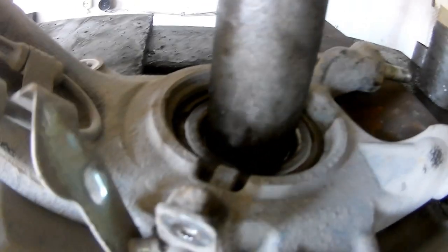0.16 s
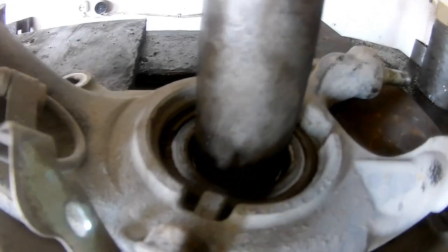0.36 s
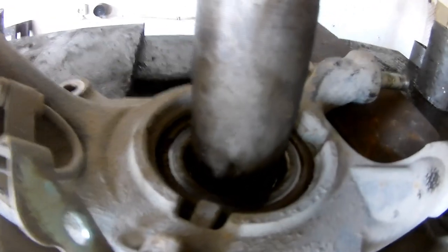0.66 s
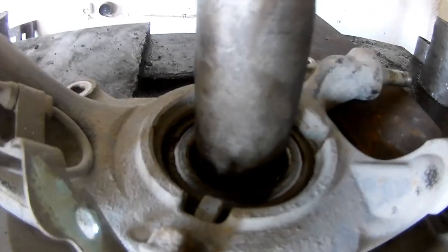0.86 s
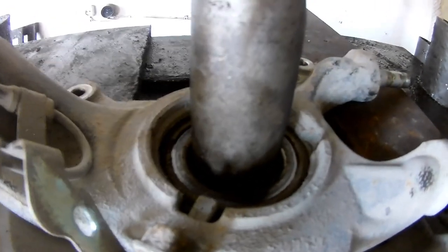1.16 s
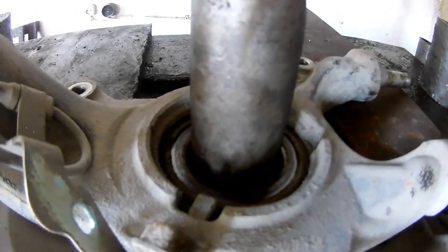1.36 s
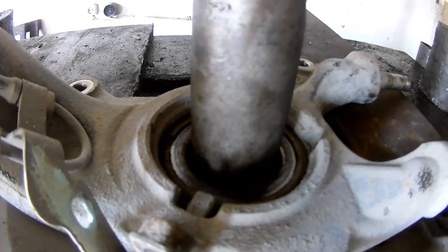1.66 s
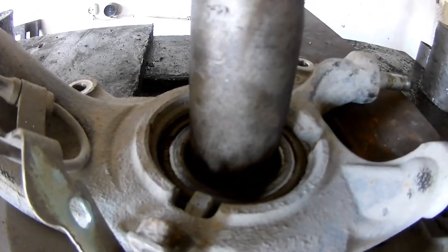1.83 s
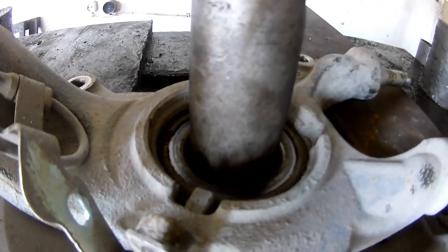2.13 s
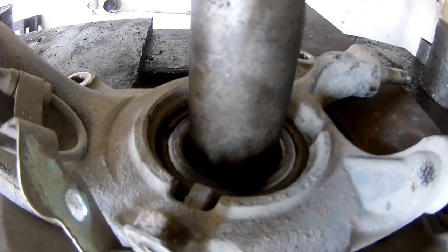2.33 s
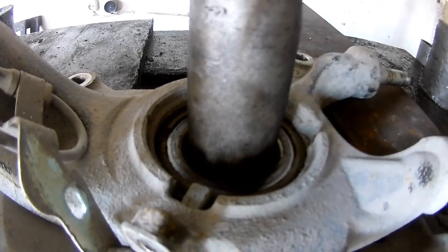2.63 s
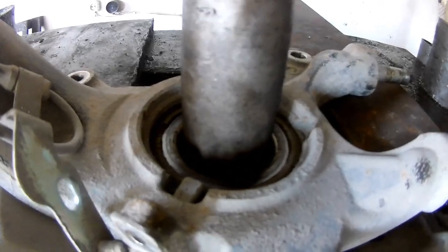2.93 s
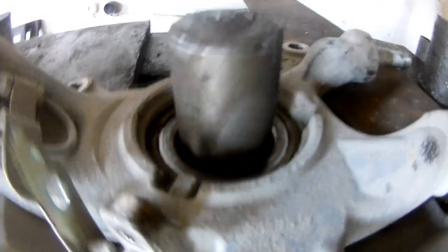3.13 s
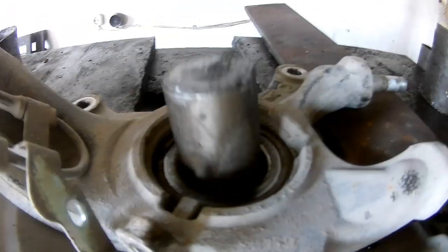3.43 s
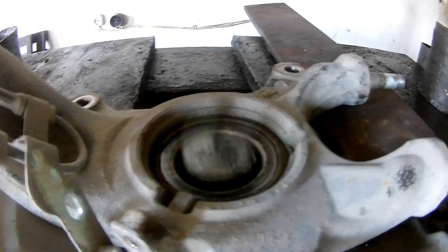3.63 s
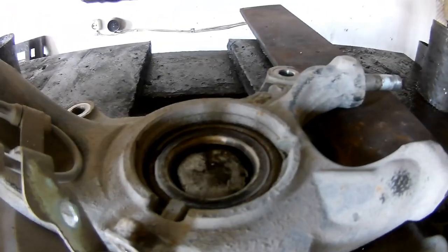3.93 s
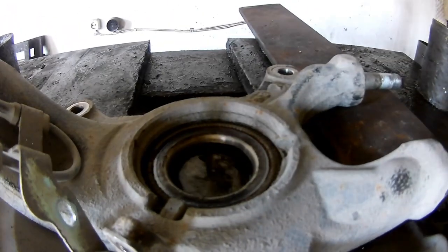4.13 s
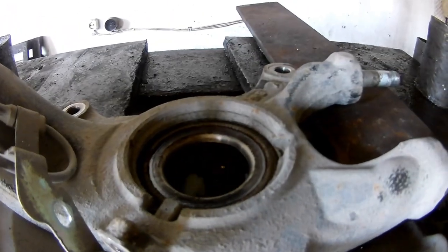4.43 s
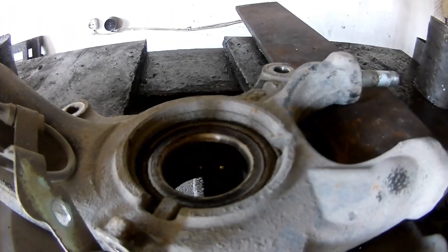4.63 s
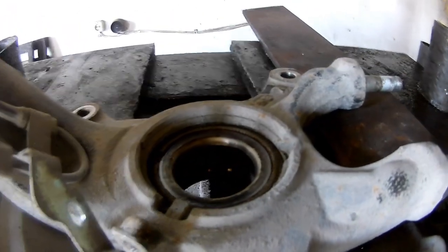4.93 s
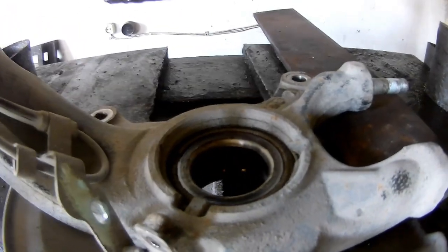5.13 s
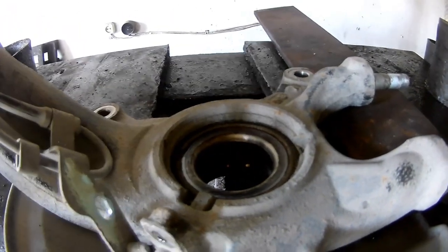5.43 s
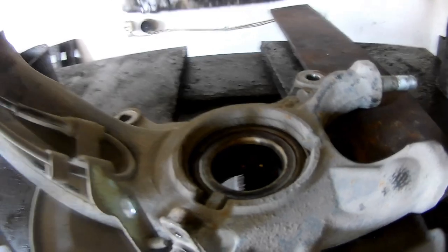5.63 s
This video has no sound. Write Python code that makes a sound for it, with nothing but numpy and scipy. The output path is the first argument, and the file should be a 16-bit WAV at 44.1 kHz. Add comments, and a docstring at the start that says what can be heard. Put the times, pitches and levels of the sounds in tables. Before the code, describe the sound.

A low motor hum with an airy rush runs throughout as a workshop press bears down on a stuck part. Suddenly the metal lets go with a close double crack and a brief rumble. Gritty scraping swells into sharp knocks as the loose steel bar slides down, then comes a single knock and some light ticks. Finally a heavy piece thumps onto the floor with a short echo.

```python
"""A motor hums in a workshop while a hydraulic press pushes a rusty hub out of a steel steering knuckle.
After three seconds the tight fit lets go in two cracks that make the steel ring. The steel bar that
pushes the hub slides down through the hole, scraping over rust and knocking as it comes loose.
At last a heavy part lands below and sets the room ringing."""
import sys
import numpy as np
from scipy import signal
from scipy.fft import rfft, irfft, next_fast_len
from scipy.io import wavfile
from scipy.ndimage import map_coordinates

SR = 44100
rng = np.random.default_rng(int(sys.argv[2]) if len(sys.argv) > 2 else 0)


def bounce(signal):
    """Save signal as a 16-bit WAV file at the path given by the first command-line argument."""
    frames = np.transpose(np.atleast_2d(signal))
    limited = np.clip(frames, -1, 1)
    pcm = np.round(limited * 32767).astype(np.int16)
    wavfile.write(sys.argv[1], SR, pcm)


N = 254898
TIME_S = np.arange(N) / SR
AFTER_HIT_S = np.arange(SR) / SR  # the second that follows a hit

# The low notes of the knuckle: pitch_hz, level_db, fade_s (time to die down by 60 dB)
KNUCKLE_NOTES = [(217, -10, .4), (320, -6, .3), (470, -7, .15), (528, -1, .3), (606, -8, .38),
                 (692, -7, .26), (853, -5, .28), (1058, -2, .2), (1147, -8, .22), (1225, 0, .2),
                 (1450, -8, .15), (1615, -8, .18)]
# The bright notes of the race, the bearing's steel ring: pitch_hz, level_db, fade_s
RACE_NOTES = [(2099, -3, .19), (2148, -6, .22), (2490, -17, .2), (2880, -16, .12), (3122, -10, .18),
              (3215, -9, .1), (3330, -10, .18), (3608, -18, .16), (4086, -14, .16), (4190, -17, .12),
              (4333, -19, .15), (4690, -12, .18), (5100, -19, .22), (5590, -18, .1), (6122, -29, .14),
              (6370, -30, .14), (7310, -34, .1), (9150, -42, .12)]
# A crack's tone, from bass to treble: pitch_hz, level_db
CRACK_TONE = [(30, -16.5), (100, -2), (300, -2), (1200, -2.5), (1900, -4), (2700, -13), (5000, -33),
              (6800, -35.5), (7900, -58.5), (9000, -35), (15000, -58)]
# How long a crack lasts: pitch_hz, fade_s
CRACK_FADE = [(150, 0.059), (1000, 0.14), (4000, 0.12), (10000, 0.017)]
# The tone of the shaken press frame: pitch_hz, level_db
RUMBLE_TONE = [(40, -17.5), (130, -4), (250, -2), (550, -3.5), (900, -2.5), (1600, -20.5), (3000, -32),
               (8000, -61.5)]
# Each jerk of the hub: start_s, level_db, bass_db, treble_db, race_db
HUB_JERKS = [(3.0117, -23, 4, -28, -13), (3.0163, -23.5, 4, -10.5, -11), (3.0567, -31, 15, -12.5, -25),
             (3.0617, -21, 5.5, 5.5, -14), (3.0705, -30.5, -5, 4.5, -7.5), (3.2698, -27, 1, -11, -2)]
# Squeals of slipping rust: start_s, length_s, first_hz, last_hz, level_db
RUST_SQUEALS = [(3.011, 0.045, 1252, 1187, -27), (3.06, .018, 1484, 1785, -20.5)]
def hub_breaking_free():
    """The rusted hub lets go in jerks: each cracks, rings the steel and shakes the press frame."""
    out = np.zeros(N)
    for start_s, level_db, bass_db, treble_db, race_db in HUB_JERKS:
        crack = amp(-.5) * dying(noise(CRACK_TONE, SR), CRACK_FADE) + amp(2.5) * pulse(CRACK_TONE)
        steel = amp(-10) * ring(KNUCKLE_NOTES) + amp(race_db) * ring(RACE_NOTES, sustain=.75)
        rumble = amp(-13) * dying(noise(RUMBLE_TONE, SR), [(150, .99), (600, .73), (2000, .26)])
        tone = [(400, bass_db), (900, .0033), (1800, .015), (4000, treble_db)]
        add(out, start_s, amp(level_db) * (shape_tone(crack + steel, tone) + rumble))
    for start_s, length_s, first_hz, last_hz, level_db in RUST_SQUEALS:
        glide_hz = np.linspace(first_hz, last_hz, int(length_s * SR))
        squeal = np.sin(2 * np.pi * np.cumsum(glide_hz) / SR)
        add(out, start_s, amp(level_db) * signal.windows.tukey(len(squeal), .5) * squeal)
    return out


# The tone of a heavy thump: pitch_hz, level_db
THUMP_TONE = [(30, -29), (100, 4.5), (220, 9), (500, 3.5), (800, 8.5), (1300, 8.5), (2200, 1), (3200, -10),
              (4600, -17), (6300, -39), (8000, -62), (14000, -58)]
# The part lands on its edge, then its face, then rocks: start_s, level_db
FLOOR_HITS = [(5.357, -35), (5.361, -17), (5.364, -23), (5.371, -47), (5.378, -21.5)]
def part_landing():
    """A heavy part hits the floor under the press and rocks flat."""
    out = np.zeros(N)
    for start_s, level_db in FLOOR_HITS:
        tail = dying(noise(THUMP_TONE, SR), [(200, .27), (1500, .15), (6000, .21)])
        add(out, start_s, amp(level_db) * (pulse(THUMP_TONE) + amp(-12.5) * tail))
    return out


# The notes of the freely ringing bar: pitch_hz, level_db, fade_s
BAR_NOTES = [(3976, -2, .5), (3988, -6, .5), (4700, -14, .25), (5120, -15, .35), (5744, -20, .55),
             (6650, -26, .3)]
# The tone of a dry knock: pitch_hz, level_db
KNOCK_TONE = [(200, -25), (750, -15), (1080, 0), (1600, 0), (2300, -17), (3200, -25), (4500, -46),
              (12000, -64)]
# Each knock of the bar: start_s, level_db, ring_db
BAR_KNOCKS = [(3.5805, -13, -75), (3.6455, -28, -54), (3.660, -18, -75), (4.5017, -20.5, -58),
              (4.767, -35, -90), (4.852, -43, -69), (4.9154, -44, -95)]
def bar_knocking():
    """The loose bar knocks, hops once and, where it bounces clear, sings on with a wavering ring."""
    touch_s, hop_s, hop_db = .00022, .0123, -15
    knocks, singing = np.zeros(N), np.zeros(N)
    touch = signal.windows.hann(round(touch_s * SR) + 2)
    for start_s, level_db, ring_db in BAR_KNOCKS:
        click = pulse(KNOCK_TONE) + amp(-18) * dying(noise(KNOCK_TONE, SR), [(1000, .06), (5000, .04)])
        knock = np.convolve(click, touch / touch.sum())  # a longer touch makes a duller click
        add(knocks, start_s, amp(level_db) * knock)
        add(knocks, start_s + hop_s, amp(level_db + hop_db) * knock)
        add(singing, start_s, amp(ring_db) * ring(BAR_NOTES))
    return knocks + singing * amp(2.5 * wobble(45) - 1)


# The bar brushes the side of the hole: start_s, level_db, race_db
BAR_GRAZES = [(.098, -67, -6), (1.953, -59.5, -12), (3.2197, -44, -20.5), (3.2515, -40.5, -17),
              (3.452, -44, -10.5), (4.1284, -45, -3.5), (4.394, -55, -12)]
def bar_sliding():
    """The sinking bar grazes the hole, chatters at an even pace, bites once and scrapes over rust."""
    chatter_start_s, chatter_gap_s, clear_s = 3.4923, .0219, 3.68
    out = np.zeros(N)
    for start_s, level_db, race_db in BAR_GRAZES:
        add(out, start_s, amp(level_db) * graze(treble_db=-5, race_db=race_db))
    add(out, 3.58, amp(-28.5) * graze(treble_db=4, race_db=-9.5))  # the tilted bar bites into the race
    for start_s in np.arange(chatter_start_s, clear_s, chatter_gap_s):
        add(out, start_s, amp(-39 + rubbing_db(start_s)) * graze(treble_db=-1.5, race_db=-8))
    return out + rust_scraping(start_s=3.43, end_s=clear_s)


# The tone of a light tick on steel: pitch_hz, level_db
TICK_TONE = [(200, -16.5), (1000, 2.5), (2100, -2.5), (2450, -12.5), (3000, -2), (3700, -16), (4500, -10),
             (5900, -22.5), (7200, -28), (8000, -45), (9200, -37), (15000, -47)]
def graze(treble_db, race_db):
    """One light touch of the bar: a tick that stirs mostly the steel's bright notes."""
    tail = dying(noise(TICK_TONE, SR), [(1000, .06), (5000, .06), (10000, .04)])
    tick = amp(7) * pulse(TICK_TONE) + amp(-4) * tail
    steel = amp(-9) * ring(KNUCKLE_NOTES) + amp(race_db) * ring(RACE_NOTES, sustain=.95)
    return shape_tone(tick + steel, [(300, -18), (1000, 1.5), (2000, 7), (4000, treble_db)])


def rust_scraping(start_s, end_s, grains_per_s=710, fade_s=.03):
    """The bar crushes grains of rust; every grain ticks and rings the race."""
    grains = rng.standard_normal(N) * (rng.random(N) < grains_per_s / SR)
    one_grain = ring(RACE_NOTES, sustain=.7) + amp(21) * pulse(TICK_TONE)
    crunch = signal.fftconvolve(grains, one_grain)[:N]
    tone = [(500, 1), (1500, 5), (2200, 1), (3000, 1.5), (4600, -1.5), (9000, -8.5)]
    touching = ramp(start_s - fade_s / 2, fade_s) - ramp(end_s, fade_s)
    return touching * amp(-43.5 + rubbing_db(TIME_S)) * unit(shape_tone(crunch, tone))


def rubbing_db(time_s, peak_s=3.613, rise_db_per_s=57, fall_db_per_s=109.5):
    """How hard the sliding bar rubs: it swells to a peak, then eases."""
    return np.minimum(rise_db_per_s * (time_s - peak_s), fall_db_per_s * (peak_s - time_s))


# The notes in the motor's hum: cycles_per_turn, level_db
HUM_NOTES = [(2, -86), (3, -63), (4, -68.5), (5, -64), (6, -71.5), (8, -65.5), (9, -60), (11, -67.5),
             (14, -63.5), (20, -68.5), (25, -63), (49, -65.5), (51, -60), (53, -71), (55, -61.5),
             (57, -75.5), (71, -73), (110, -92.5)]
# The tone of the machine's airy rush: pitch_hz, level_db
RUSH_TONE = [(35, -36.5), (70, 2.5), (135, 2), (240, 0.5), (340, 6), (520, -2), (625, 3.5), (750, -3.5),
             (900, 0.5), (1030, -7.5), (1450, -13), (2300, -23.5), (3300, -39.5), (4400, -42),
             (6500, -55.5), (15000, -56.5)]
def motor(turns_per_s=16.65, whine_hz=2647):
    """The turning shaft hums, a whine throbs once a turn, a tone wavers and air rushes."""
    shaft_angle = 2 * np.pi * np.cumsum(turns_per_s * (1 + .0005 * wobble(3))) / SR
    load = ramp(0, length_s=1.7)  # the press bears down
    swell_db = -12.5 * (1 - load) + 2.5 * load  # three deep notes grow with the load
    hum = np.zeros(N)
    for cycles, level_db in HUM_NOTES:
        note_db = level_db + .8 * wobble(3) + swell_db * (cycles in (4, 5, 6))
        hum += amp(note_db) * np.sin(cycles * shaft_angle + 2 * np.pi * rng.random())
    whine_db = -70.5 - 4.5 * ramp(0, .62) + 1.4 * wobble(4)  # drops as the pump takes up the load
    whine = amp(whine_db) * (1 + .44 * np.sin(shaft_angle)) * np.sin(2 * np.pi * whine_hz * TIME_S)
    tone = wavering_note(pitch_hz=625, level_db=-65.5, wobbles_per_s=5)
    strokes = (1 + .13 * np.sin(4 * shaft_angle)) * amp(.4 * wobble(8))  # four to a turn
    rush = noise(RUSH_TONE, N) * amp(-47 - 1.5 * load) * strokes
    return np.sqrt(2) * (hum + whine + tone) + rush


def frame_drone():
    """The press frame drones on two notes, and shakes more once the hub lets go."""
    freed = ramp(start_s=3, length_s=.3)
    notes = wavering_note(pitch_hz=217, level_db=0) + wavering_note(pitch_hz=318, level_db=-2)
    return np.sqrt(2) * amp(-69 + 12 * freed) * notes


# How long the workshop echoes: pitch_hz, fade_s
ROOM_FADE = [(100, 0.31), (300, 0.69), (800, 1), (1800, 1), (4500, 1), (9000, 0.42)]
def room_echo(sound, build_up_s=.0027):
    """Many reflections from around the room blur into one fading tail."""
    tail = dying(rng.standard_normal(SR), ROOM_FADE) * (1 - np.exp(-AFTER_HIT_S / build_up_s))
    return signal.fftconvolve(sound, tail / np.linalg.norm(tail))[:N]


def ring(notes, sustain=1):
    """Struck steel: fading notes, at new strengths each hit. A clamped part sustains less."""
    pitch_hz, level_db, fade_s = np.transpose(notes)[:, :, None]
    strength = amp(level_db + 1.5 * rng.standard_normal(pitch_hz.shape))
    cycles = pitch_hz * AFTER_HIT_S + rng.random(pitch_hz.shape)
    attack = 1 - np.exp(-AFTER_HIT_S / .0008)
    fade = amp(-60 * AFTER_HIT_S / (fade_s * sustain))
    return attack * np.sum(strength * fade * np.sin(2 * np.pi * cycles), axis=0)


def wavering_note(pitch_hz, level_db, wobbles_per_s=6):
    """A held note whose loudness and pitch drift a little."""
    strength = amp(level_db + 2 * wobble(wobbles_per_s))
    return strength * np.sin(2 * np.pi * pitch_hz * TIME_S + .8 * wobble(9))


def pulse(tone):
    """One click with the given tone and a peak of 1."""
    click = shape_tone(signal.unit_impulse(SR), tone)
    return click / np.abs(click).max()


def noise(tone, size):
    """Steady noise with the given tone."""
    return unit(shape_tone(rng.standard_normal(size), tone))


def shape_tone(sound, tone):
    """Turn pitches up or down along (pitch_hz, level_db) points."""
    size = 2 * next_fast_len(len(sound))
    gain = amp(value_at(tone, np.fft.rfftfreq(size, 1 / SR)))
    cepstrum = irfft(np.log(gain))
    cepstrum[1:size // 2] *= 2  # folded forward, so nothing rings before the hit
    cepstrum[size // 2 + 1:] = 0
    return irfft(rfft(sound, size) * np.exp(rfft(cepstrum)), size)[:len(sound)]


def dying(sound, fades):
    """Let each pitch die away at its own speed, along (pitch_hz, fade_s) points."""
    pitch_hz, time_s, bands = signal.stft(sound, SR, nperseg=256)
    fade = amp(-60 * time_s / value_at(fades, pitch_hz)[:, None])
    return signal.istft(bands * fade, SR, nperseg=256)[1][:len(sound)]


def value_at(points, pitch_hz):
    """Read between (pitch_hz, value) points, with octaves evenly spaced."""
    pitches, values = np.transpose(points)
    return np.interp(np.log(pitch_hz + 1), np.log(pitches), values)


def wobble(per_s):
    """A smooth curve through this many random points a second."""
    return map_coordinates(rng.standard_normal(int(N * per_s / SR) + 4), [TIME_S * per_s])


def ramp(start_s, length_s):
    """0 until the start, then rising evenly to 1."""
    return np.clip((TIME_S - start_s) / length_s, 0, 1)


def amp(db):
    """Turn decibels into a multiplier."""
    return 10 ** (np.asarray(db) / 20)


def unit(sound):
    """Scale a sound to an average strength (rms) of 1."""
    return sound / np.sqrt(np.mean(sound ** 2) + 1e-20)


def add(track, start_s, sound):
    """Mix a sound into the track."""
    part = track[round(start_s * SR):][:len(sound)]
    part += sound[:len(part)]


def scene():
    """Sounds at the knuckle are close, with a faint dull echo; the landing stirs the room much more."""
    near = hub_breaking_free() + bar_sliding() + bar_knocking()
    echo = shape_tone(room_echo(near), [(300, -24), (1400, -18), (2200, -21), (4500, -26.5)])
    landing = part_landing()
    return (near + echo + landing + amp(-6) * room_echo(landing) + motor() + frame_drone())[None]


def record(dry, ceiling=.19, top_hz=15700):
    """The microphone rounds off the loudest peaks; the ends fade and the highest treble is cut."""
    rounded = dry / (1 + np.abs(dry / ceiling) ** 6) ** (1 / 6)
    faded = rounded * signal.windows.tukey(N, .001)
    return signal.sosfilt(signal.ellip(10, .1, 80, top_hz, fs=SR, output="sos"), faded)


dry = scene()
out = record(dry)
bounce(out)
```